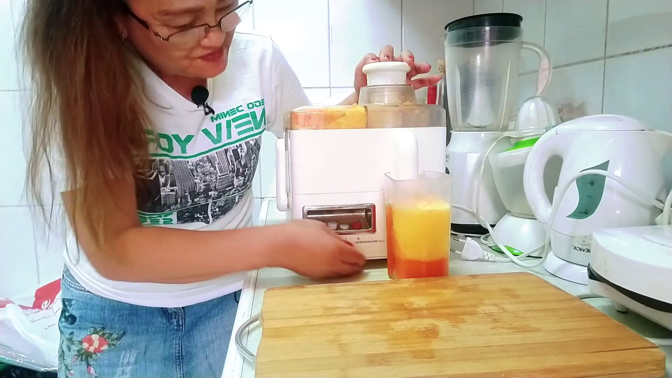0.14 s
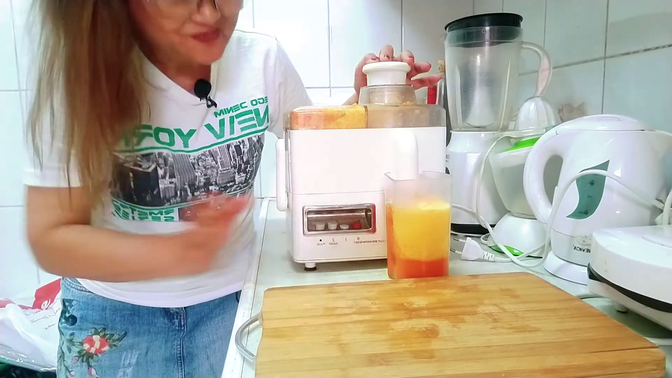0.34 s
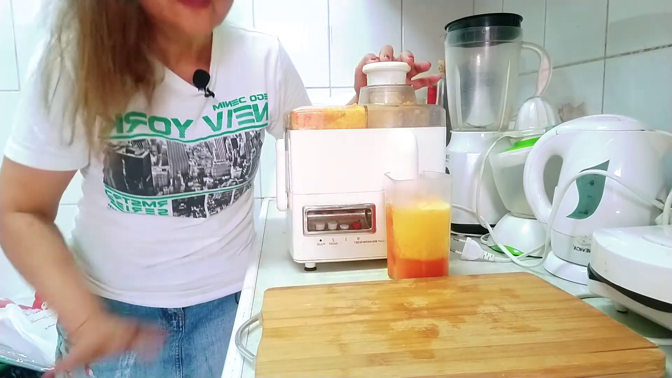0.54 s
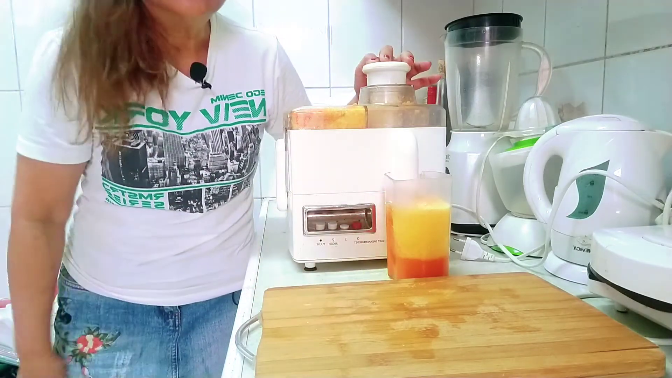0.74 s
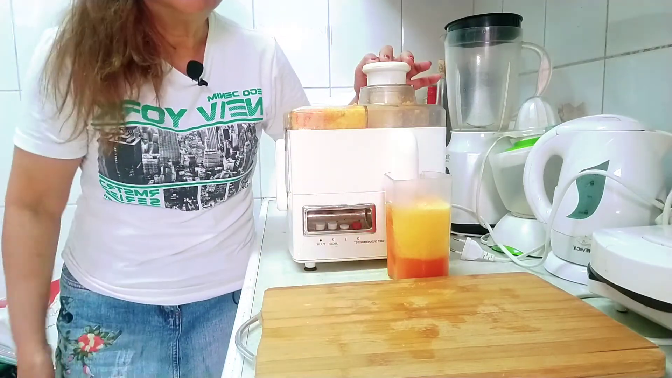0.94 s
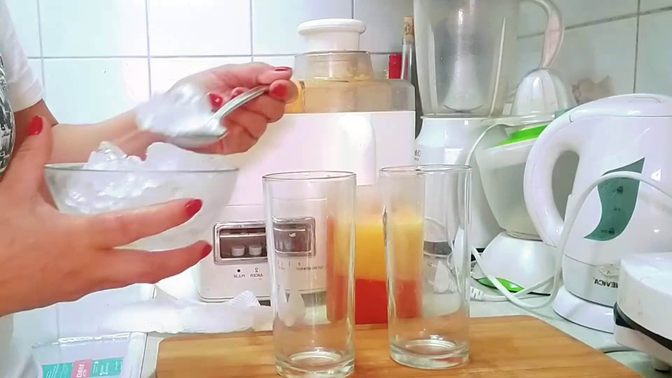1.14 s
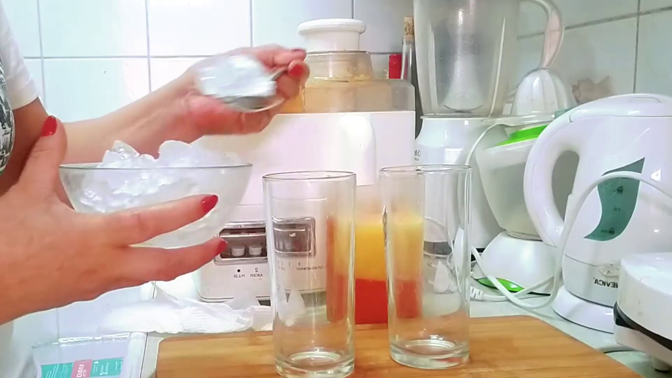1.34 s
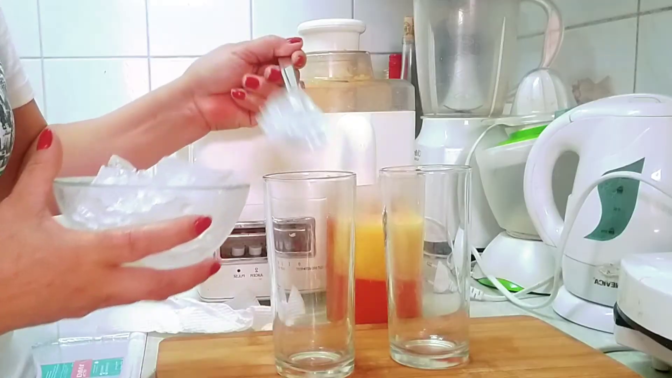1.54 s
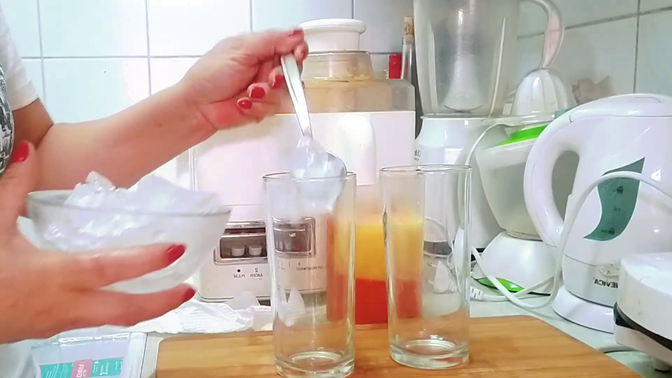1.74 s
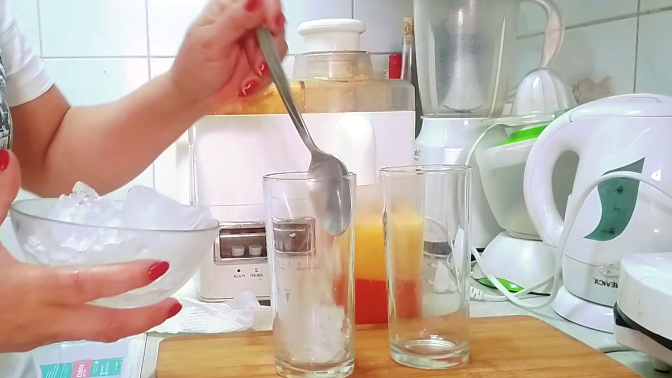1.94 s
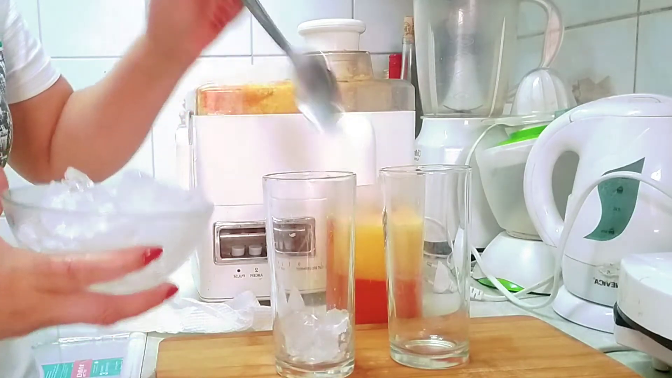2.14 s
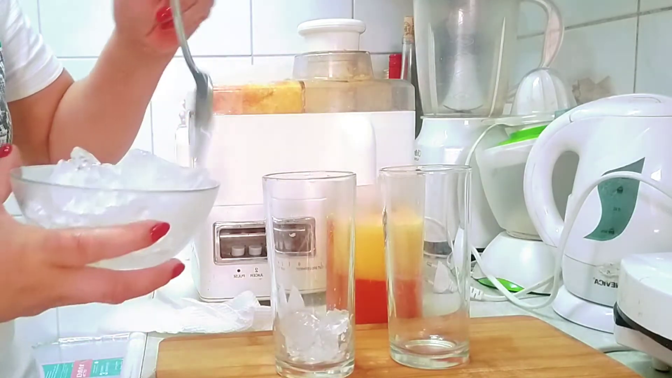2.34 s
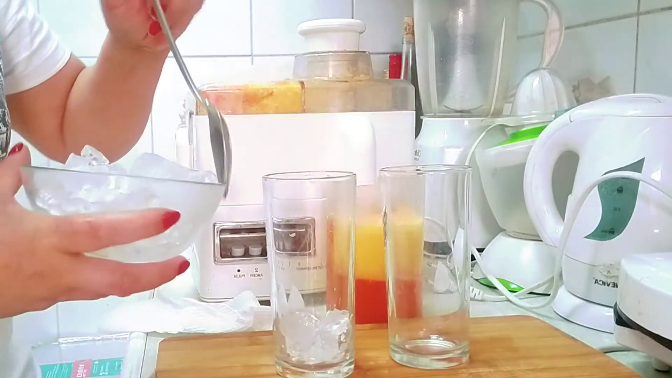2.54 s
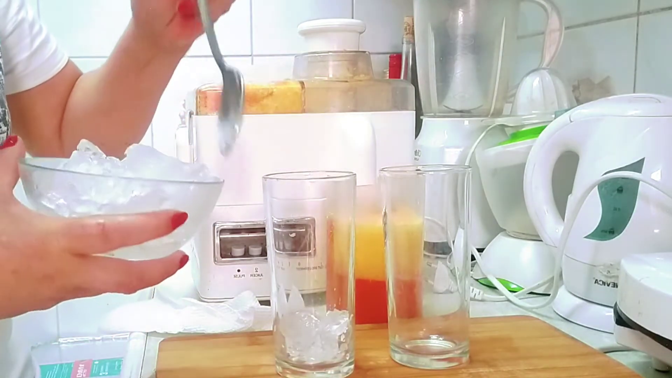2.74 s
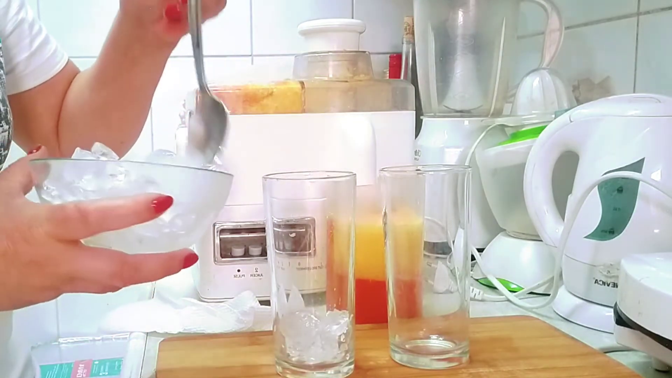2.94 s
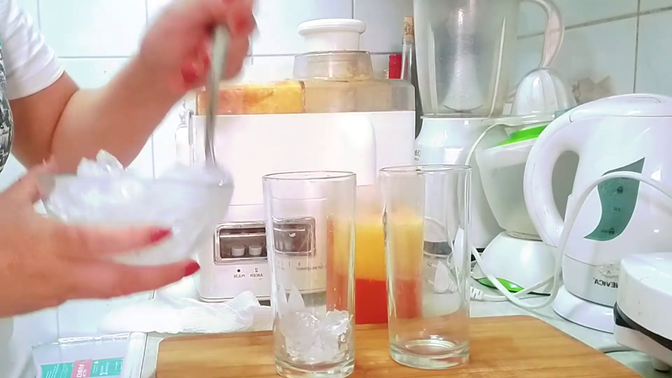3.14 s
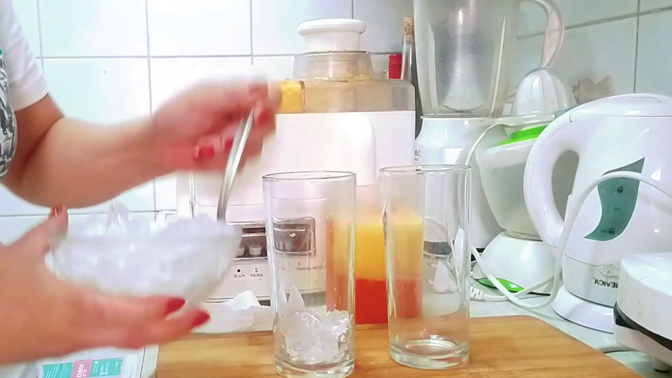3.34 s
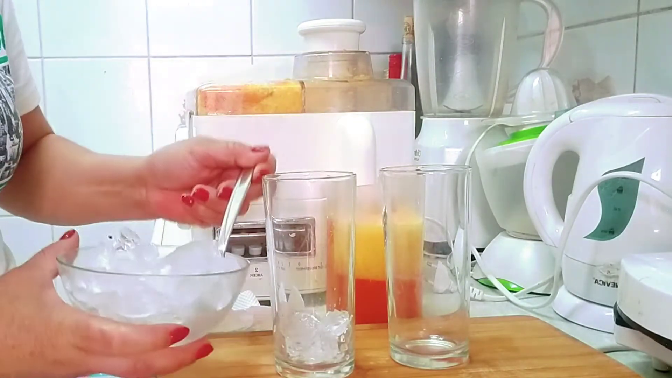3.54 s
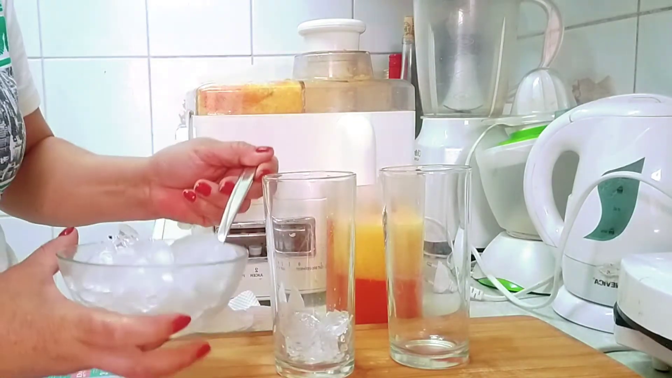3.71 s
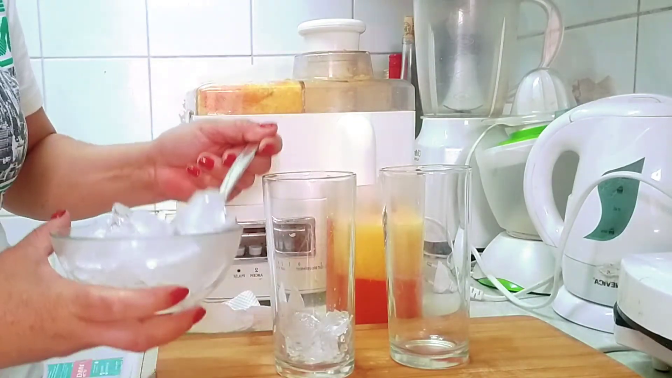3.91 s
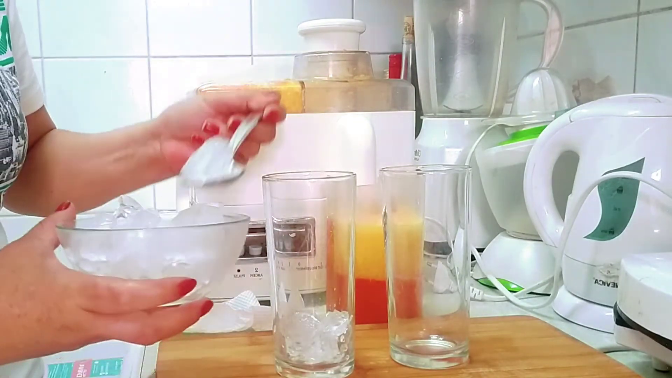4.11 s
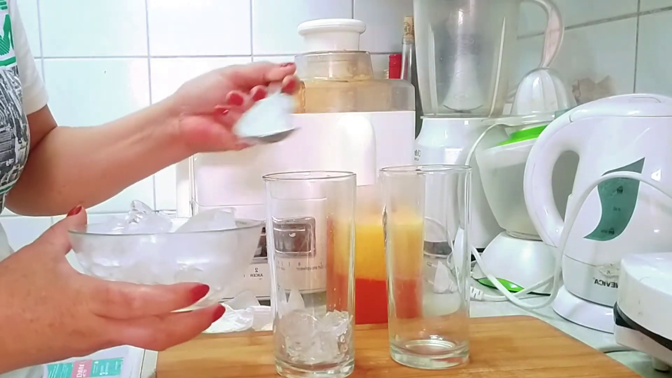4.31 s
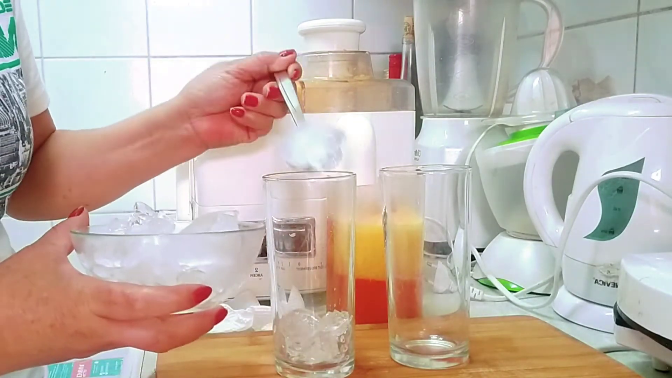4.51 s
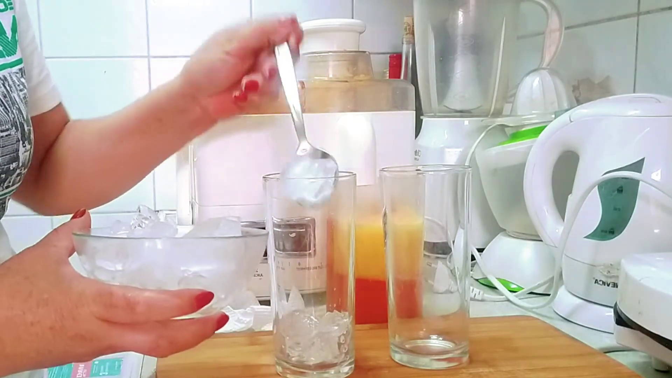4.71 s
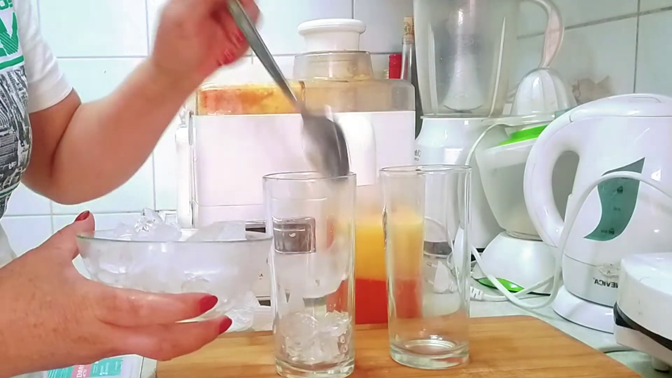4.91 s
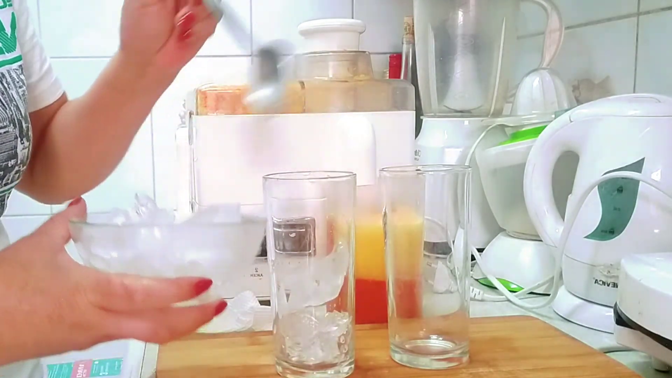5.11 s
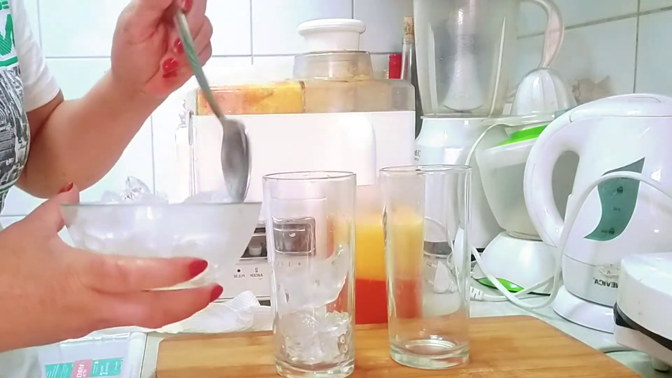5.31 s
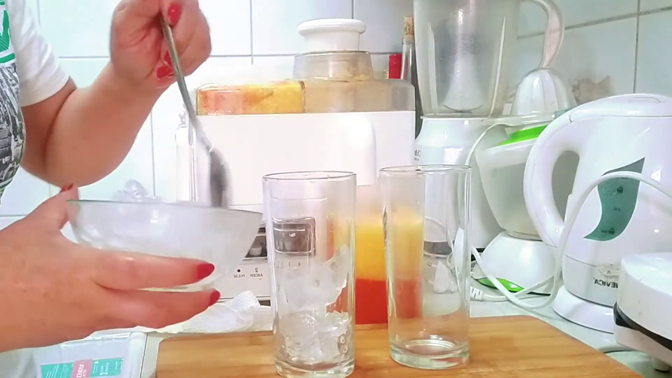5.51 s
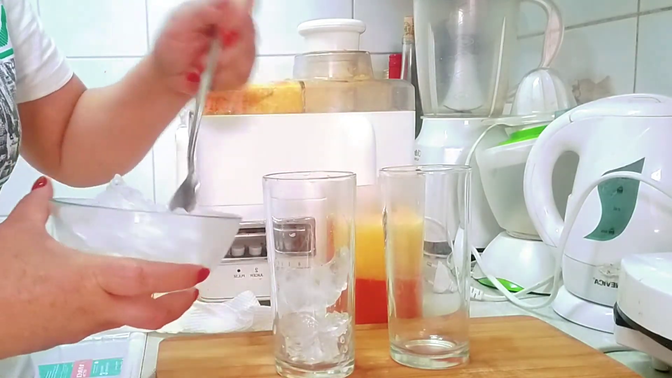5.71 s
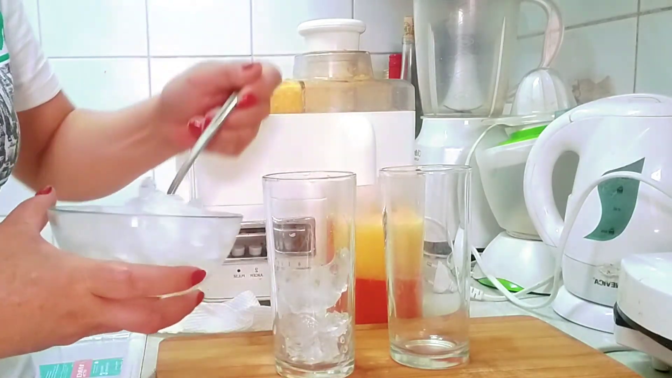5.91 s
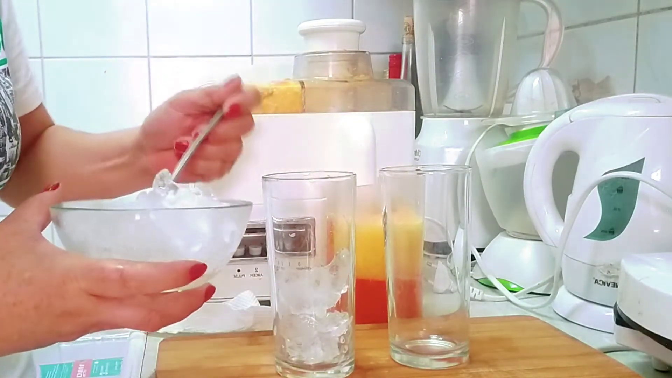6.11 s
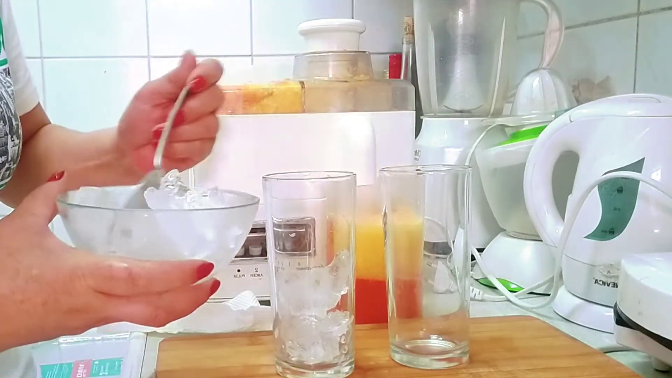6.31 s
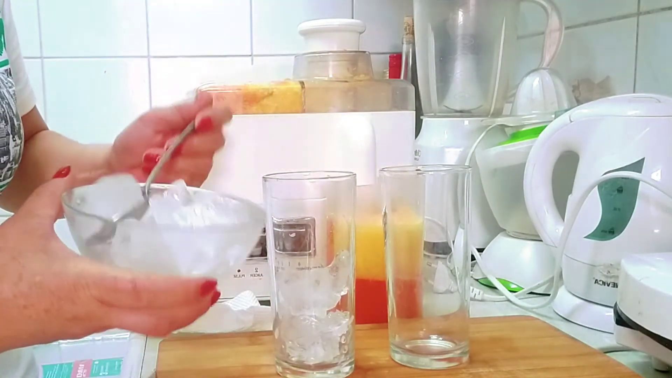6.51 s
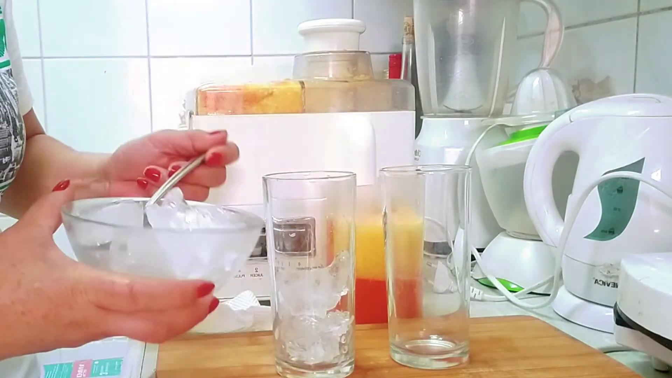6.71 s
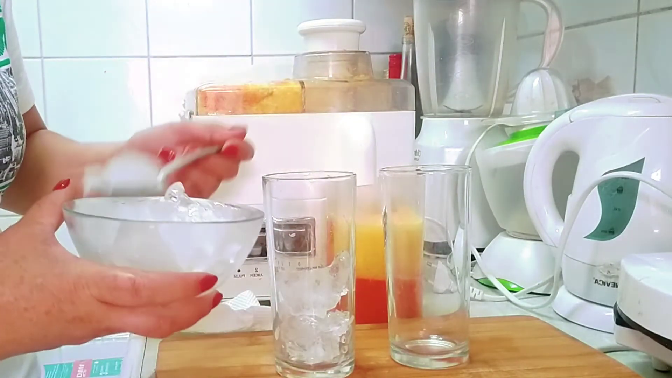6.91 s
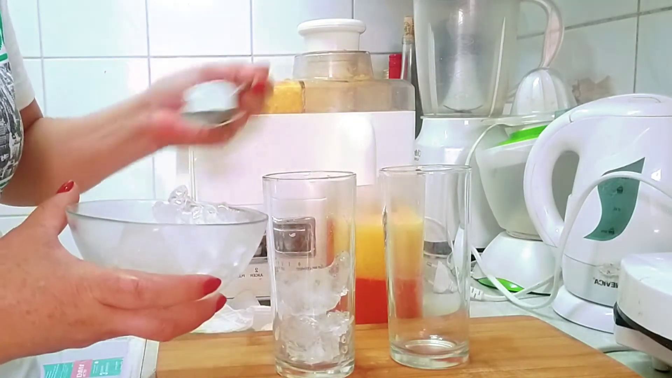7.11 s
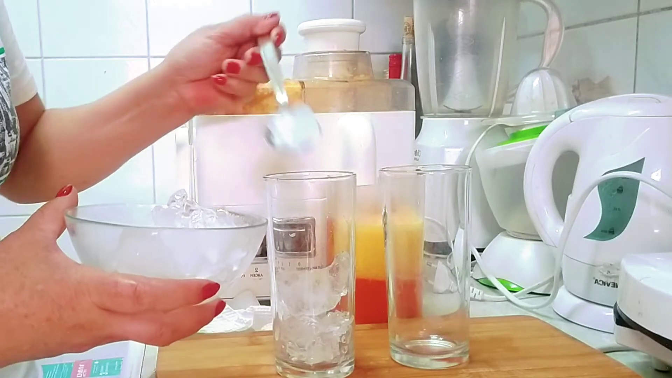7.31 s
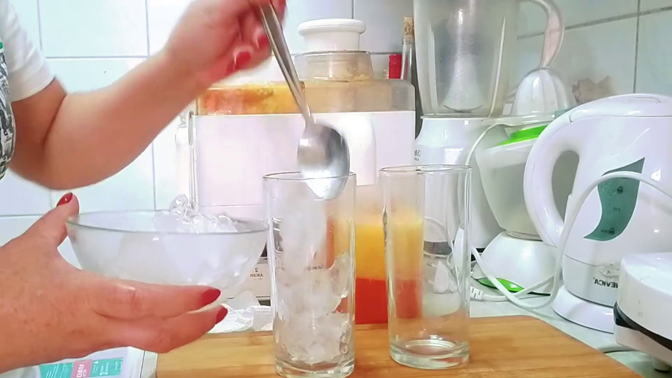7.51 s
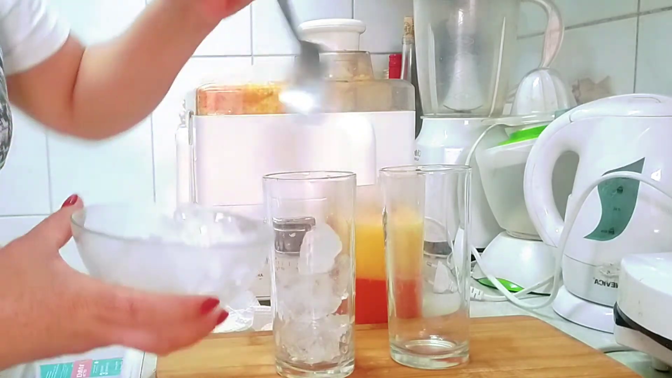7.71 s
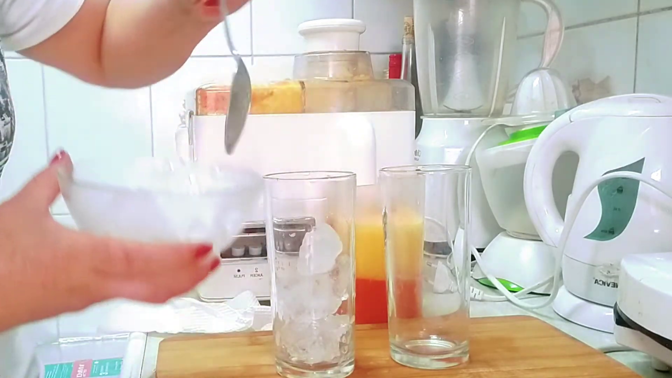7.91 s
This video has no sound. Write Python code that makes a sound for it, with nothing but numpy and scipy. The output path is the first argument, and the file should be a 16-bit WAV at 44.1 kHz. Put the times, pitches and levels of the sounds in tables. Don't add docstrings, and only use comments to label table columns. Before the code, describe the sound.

From 0 to about 1.35 s an electric juicer runs steadily: a midrange motor hum around 226 Hz with higher whine, rushing air and buzzing plastic shell, slightly rougher just before it cuts off. Then a quiet tiled kitchen with a low, wavering fridge hum. At 1.74 s crushed ice drops into a tall glass, a dense run of cracks and bright clinks to 2.2 s, the glass ringing and the board thudding softly. From 2.45 to 3.2 s a spoon digs in a glass bowl, hardest at 3.09. Light stirring, ticks and faint squeaks follow until 4.3 s. A second drop clatters at 4.69-5.04 s. Digging resumes from 5.36 s, with sharp crunches near 5.46 and 6.6 s and smaller ticks until 7.4 s. The third drop, loudest and brightest, lands at 7.52 s, its last lumps settling by 7.75 s.

```python
import sys
import numpy as np
from scipy import signal
from scipy.fft import rfft, irfft, next_fast_len
from scipy.io import wavfile
from scipy.ndimage import uniform_filter1d

SR = 44100
rng = np.random.default_rng(int(sys.argv[2]) if len(sys.argv) > 2 else 0)


def linear_from_db(decibels):
    return 10 ** (np.asarray(decibels, float) / 20)


def persist_wave(psi):
    counts = np.round(np.clip(psi, -1, 1) * 32767).astype(np.int16)
    wavfile.write(sys.argv[1], SR, np.atleast_2d(counts).T)


N = 350595

SHAFT_HZ, MAINS_HZ = 226.08, 100.2
# multiple of shaft speed, multiple of MAINS_HZ.
ORDERS = [(0, 1), (1, 0), (1, 1), (2, 0), (2, 1), (2, 2), (3, 0), (7, -1), (7, 0), (12, -1), (12, 0),
          (12, 1),
          (24, 0), (36, 0), (48, 0), (50, 0), (60, 0), (37, 0), (51, 0), (60, 1), (9, 0), (10, 0),
               (10, -1), (13, 0), (13, 1), (15, 0)]
TONES_DB = [-46, -31, -51, -50.5, -51.5, -50, -47, -49.5, -76, -49, -39, -61, -56.5, -44, -68, -68, -55,
            -53, -55, -56, -54.5, -55.5, -62, -70, -63, -56]
# frequency in Hz, density in dB per Hz.
WHIR = [(24, -63), (40, -49), (91, -17), (167, -17.5), (226, -11), (372, -17.5), (1040, -12.5), (1950, -20),
        (2770, -19.5), (2980, -22), (4800, -29.5), (7930, -27), (9220, -32), (14800, -20), (16000, -16.5)]
# frequency in Hz, width in Hz, level in dB.
HOUSING = [(731, 44, 1), (905, 180, 1.5), (1035, 170, 4), (1128, 39, 2.5), (1464, 510, -11),
           (2200, 720, -15), (3230, 81, -7.5)]
# time in seconds, level in dB.
LOAD = [
    (0.0, -0.5),
    (0.5, 0.5),
    (1.09, -2),
    (1.36, 2),
]
# start in seconds, end in seconds.
FADE = (1.342, 1.3874)
WAVER_DB, SHELL_DB, AIR_DB = .9, -33, -29
AIR_FOLLOWS = 0.05

# frequency in Hz, density in dB per Hz.
ROOM_TONE = [(12, -44), (20, 1.5), (46, -8.5), (65, -18.5), (101, -8), (172, -9.5), (285, -14.5),
             (357, -17.5), (678, -21), (825, -23.5), (897, -19), (1060, -22), (1570, -25), (3530, -33),
             (5500, -44.5), (7800, -38.5), (16000, -43.5)]
ROOM_DB = -58
# time in seconds, level in dB.
DRONE = [(1.4, -60.5), (2.71, -59), (2.95, -65.5), (3.81, -57), (4.65, -79), (4.68, -58), (5.25, -63.5),
         (5.54, -81), (5.69, -63.5), (6.67, -68), (6.74, -55), (7.42, -67), (7.53, -51.5), (7.95, -63.5)]
# frequency in Hz, level in dB.
HUMS = [(46, -65.5), (191, -74.5), (288, -68), (430, -72.5), (814, -71)]

# start in seconds, level in dB.
THUDS = [
    (1.741, -43.5),
    (1.926, -43),
    (2.07, -43),
    (4.686, -43),
    (4.798, -46),
    (4.94, -42.5),
    (7.52, -42),
    (7.596, -42),
]
BOARD_HZ, BOARD_WIDTH_HZ, BOARD_T60 = 125, 140, 0.29
# start in seconds, level in dB,
# frequency in Hz, t60 in seconds.
AIR_COLUMN = [(1.744, -30, 563, 0.073), (1.984, -40.5, 599, 0.21), (2.056, -38, 661, 0.13),
              (2.158, -41.5, 657, 0.21), (4.69, -38.5, 604, 0.1), (4.77, -42, 616, 0.13),
              (4.845, -44, 621, 0.24), (4.98, -43.5, 637, 0.13), (4.885, -42, 616, 0.049),
              (4.939, -39, 615, 0.079), (7.52, -33.5, 632, 0.066), (7.597, -44, 672, 0.14)]
# start in seconds, level in dB, frequency in Hz, t60 in seconds.
CLACKS = [
    (1.9111, -43, 1465, 0.25),
    (1.987, -29, 1730, .023),
    (6.608, -36, 1592, .16),
    (7.5957, -25.5, 1580, 0.078),
    (7.62, -30, 1604, 0.097),
]
# start in seconds, level in dB, frequency in Hz,
# t60 in seconds.
RINGS = [(2.011, -33, 11560, 0.38), (2.011, -44, 9200, .22), (2.052, -42, 6600, .2),
         (3.209, -40, 2150, 0.27), (4.003, -30, 14400, 0.071), (4.978, -28, 15200, .22),
         (5.363, -41.5, 3020, 0.21), (5.363, -47, 4200, .16), (6.218, -38, 3870, 0.1),
         (6.22, -41, 4000, 0.18), (6.609, -28.5, 2215, 0.41), (6.612, -38, 7850, 0.14),
         (7.52, -31.5, 2680, 0.045), (7.521, -23, 15235, 0.18)]
# start in seconds, level in dB, frequency in Hz, t60 in seconds.
PINGS = [(1.744, -31, 3540, 0.042), (1.932, -37, 3400, .08), (1.932, -20, 2580, 0.086),
         (1.933, -37, 1650, .05), (1.984, -30, 4060, 0.042), (2.051, -35, 1700, .09),
         (2.051, -35, 3910, .08), (2.056, -38, 4850, 0.053), (2.066, -48, 3570, 0.13),
         (2.086, -32, 4250, 0.053), (2.16, -32, 4800, 0.037), (2.172, -47, 1060, 0.039),
         (2.214, -50, 1150, 0.031), (2.468, -44, 2100, .05), (2.571, -35.5, 2166, 0.1),
         (3.026, -51, 11800, .1), (2.778, -38, 8560, .08), (3.088, -32, 14600, .06), (3.209, -38, 2230, .2),
         (4.897, -28, 11400, .04), (4.924, -28.5, 2750, 0.092), (4.924, -30, 2360, 0.092),
         (4.926, -24.5, 2540, .07), (4.93, -36, 7400, .06), (4.977, -26.5, 2604, 0.087),
         (5.46, -34, 7200, 0.073), (6.594, -33, 12700, 0.1), (5.676, -46, 942, 0.089),
         (5.675, -45, 2410, .12), (5.887, -32.5, 2460, .15), (5.953, -45, 3900, .15),
         (5.978, -46, 1520, 0.34), (6.218, -47, 8270, 0.13), (6.608, -36, 8530, .2),
         (6.971, -35.5, 2120, 0.035), (7.04, -44, 2210, 0.037), (7.262, -36, 2200, 0.04),
         (7.596, -28, 2600, 0.093), (7.66, -47, 4050, 0.045)]
LUMP_T60 = .11
FLUTTER = .6

GLASS_HZ = [2499, 2520, 2600, 5715, 5745, 6197, 6235, 8716, 9340, 9378, 10800, 11240, 11570, 11930, 12960,
            15235]
BOWL_HZ = [2150, 2223, 2546, 2900, 3951, 4107, 4344, 4974, 6000, 6080, 7180, 8522, 11140, 11790, 12720,
           14200]
# level in dB, t60 in seconds.
GLASS = [(-14, 0.1), (-22, 0.26), (-1, 0.071), (-6.5, 0.29), (-4.5, 0.26), (-33, 0.1), (-3.5, 0.064),
         (-47.5, .1), (-10, 0.19), (-12, 0.25), (-8, 0.15), (-8.5, 0.15), (-0.5, 0.093), (-27, 0.087),
         (-2, 0.12), (-1.5, 0.15)]
BOWL = [(-7, 0.24), (-12, 0.12), (2.5, 0.032), (-7.5, 0.12), (-7.5, 0.25), (-10.5, 0.12), (-5, 0.055),
        (-15, 0.087), (-1, 0.053), (-2.5, 0.25), (-28.5, 0.14), (-9, 0.13), (-7.5, 0.17), (-18, 0.14),
        (-13.5, 0.11), (-8.5, 0.17)]
SPOON_HZ = [5715, 5745]
# start in seconds, peak in dB, dullness (low over high) in dB,
# ring in dB.
DROPS_1 = [(1.7435, -13.5, 9.5, 1), (1.7595, -22, -4, 7.5), (1.814, -32.5, 3, 9), (1.9075, -17, -1, -10),
           (1.9305, -13.5, 3, -5), (1.9511, -19, 4, -8), (1.9849, -12.5, -4, -7), (2.0127, -26, -3, 1),
           (2.0505, -12, -4, -11), (2.0648, -11, -9, -8.5), (2.0859, -20.5, -13, -1.5),
           (2.1413, -29.5, -7, 2), (2.1634, -19, -14, -18)]
DROPS_2 = [(4.6885, -13, 8, 4.5), (4.7037, -22.5, -2, 4.5), (4.7711, -19, 2.5, -2), (4.8148, -48, 24, 26),
           (4.8408, -28, 3.5, 4.5), (4.8674, -24, -7, -2.5), (4.8863, -22, 7, 0.5), (4.9215, -21, -1, -5),
           (4.929, -13.5, 1, -1), (4.9787, -20, 0.5, 0.5), (4.9956, -32, 8, -16), (5.0386, -47, -6, -17)]
DROPS_3 = [
    (7.5181, -10.5, 6.5, 1),
    (7.5215, -4, -19, -13),
    (7.5737, -22, 13, 11),
    (7.585, -18.5, -6, -3),
    (7.5967, -19, 11, 6.5),
    (7.6226, -35, -3, 7),
    (7.6594, -29.5, 16, 9),
    (7.7363, -54, 14.5, -10),
]
# start in seconds, peak in dB, dullness in dB, ring in dB.
DIGS_1 = [
    (2.466, -31.5, 22, -13),
    (2.5694, -15, -0.5, -14),
    (2.779, -20, -6, -17),
    (3.0257, -37, 28, 2.5),
    (3.0723, -30.5, 12, -16.5),
    (3.0865, -6, -4.5, -17.5),
    (3.208, -15, -6.5, -16.5),
]
DIGS_2 = [(5.3632, -23, 6.5, -7), (5.4595, -12.5, -8, -18), (5.5325, -25.5, 4, -9), (5.641, -34.5, -9, -2),
          (5.6734, -26, 13, -25), (5.7708, -33.5, 20, 0.5), (5.8392, -30.5, 43, 2.5), (5.888, -21, 4, -16),
          (5.9197, -37, 7, -5), (5.9784, -24.5, -1, -31), (6.0194, -50, 15, -23), (6.0646, -66, -5, -22),
          (6.136, -40, 17, -14), (6.1985, -39, 14, -5), (6.217, -22, 7, -5), (6.3039, -32.5, 19, -7),
          (6.3555, -36, -4, -22),
          (6.4187, -31, 24, -5), (6.4347, -29, 10, -17), (6.467, -36.5, 24, -17), (6.5256, -28, 4, -5.5),
          (6.568, -32, 17, -1), (6.576, -26.5, 15, -10), (6.593, -22, -20, -12), (6.6064, -7, 6.5, -6.5),
          (6.64, -9.5, 4.5, -9), (6.703, -19, 1, -4), (6.951, -45, 4, -10), (6.97, -16, -13, -13),
          (7.0385, -38.5, 45, 4), (7.058, -24, -32, -19), (7.082, -31.5, -15, -15),
          (7.0987, -37.5, 13.5, -22), (7.2413, -20.5, 0, -26), (7.2875, -22, 5, -14.5),
          (7.4044, -44, -10, -16)]
# start in seconds, peak in dB, dullness in dB.
STIRS = [(3.455, -36.5, 22), (3.4664, -30, -6), (3.5344, -36, -22), (3.6574, -37, -2), (3.677, -33, -17),
         (3.6894, -32.5, -3), (3.716, -33, -9), (3.7658, -31, 15), (3.8524, -46, -5), (3.8764, -30, 0),
         (4.0041, -22.5, -4), (4.1255, -48, -6), (4.14, -40, 15), (4.1802, -35, 22), (4.2188, -25, 9.5),
         (4.235, -34, 18), (4.2966, -38, 39)]
STIR_RING_DB = -19
BAND_HZ = (300, 2200, 5500, 12000)
MIDDLE_SHARE, MIDDLE_DB = 0.46, 1.5
# frequency in Hz, level in dB.
CRACK = [(300, 2), (2300, 3.5), (4800, -1.5), (6200, -1.5), (7200, 2.5), (8400, 5), (10200, -8), (12500, 3),
         (14800, 7.5), (16000, 7.5)]
SHIVER_DB = 5
TOUCH_DB = -5

# time in seconds,
# level in dB, t60 in seconds.
WALL = [(1.7436, -17.5, 0.47), (1.7694, -21.5, 0.57), (1.8144, -35, 0.71), (1.8674, -38, 0.32),
        (1.93, -26, 0.3), (1.9674, -41, 0.36), (2.0124, -42, 0.55), (2.0642, -37.5, 0.7),
        (2.1394, -43.5, 0.26), (4.6884, -21.5, 0.23), (4.716, -29, .2), (4.731, -24.5, 0.33),
        (4.755, -31, 0.13), (4.7711, -29.5, .2), (4.8005, -32, 0.64), (4.8294, -28, 0.51),
        (4.855, -37.5, 0.22), (4.887, -31.5, 0.27), (4.9244, -30, 0.29), (4.9791, -38, 0.27),
        (5.0294, -39.5, 0.17), (5.09, -55, 0.24), (7.574, -26.5, 0.26), (7.6, -36, 0.12),
        (7.6216, -28.5, 0.73), (7.6594, -32, 0.19), (7.7, -57, 0.16), (7.7343, -43, .4),
        (7.7672, -45, 0.37)]
# time in seconds, level in dB, t60 in seconds.
RIM = [(1.7436, -22, 0.31), (1.812, -47, .2), (1.8327, -31, 0.31), (1.899, -50, .2), (1.933, -32, 0.2),
       (1.96, -42, .2), (2.0657, -41, 0.23), (4.6885, -33.5, 0.3), (4.7526, -45, 0.3),
       (4.7704, -32.5, 0.16), (4.8854, -51, 0.3), (4.9247, -52, 0.18), (4.9771, -33, 0.22),
       (5.02, -46, 0.29), (7.5842, -32.5, 0.33), (7.6224, -37, 0.3), (7.6594, -40, 0.25), (7.71, -65, 0.21)]
WALL_HZ, RIM_HZ = 2501, 6200

# start in seconds, length in seconds, level in dB, brightness in dB.
SLIDES = [(1.797, 0.33, -45, 25), (1.965, 0.073, -34.5, -20), (2.64, 0.11, -48.5, -2.5),
          (3.156, 0.048, -39.5, 3.5), (3.44, 0.3, -54, 8), (3.752, 0.33, -54.5, 5.5), (4.01, 0.23, -54, 1),
          (4.855, 0.042, -44, 0), (4.925, 0.065, -62, -2), (5.496, 0.21, -45.5, -21),
          (5.748, 0.15, -57, 26), (5.92, 0.089, -39.5, -0.5), (6.497, 0.31, -61.5, -5),
          (6.62, 0.12, -45.5, 6), (7.15, 0.086, -73, -6), (7.55, 0.2, -57, 3)]
SLIDE_RISE_DB_PER_S, SLIDE_FALL_DB_PER_S, REST_DB = 155.5, 112, -77
# frequency in Hz, density in dB per Hz.
ICE = [(500, -14), (1200, -3), (2400, 1.5), (3600, -5), (5200, -12.5), (8200, -7.5), (10500, -14),
       (14800, -4.5), (16000, -2)]
CLUMP_DB, PATCH_DB, SING_DB = 2.3, 3.3, -3
# frequency in Hz, t60 in seconds.
KITCHEN = [(200, 1), (1500, 0.41), (4000, 0.53), (9000, 0.4), (16000, 0.26)]
NOTES_ROOM_DB = -7
# start in seconds, length in seconds, level in dB,
# first frequency in Hz, last frequency in Hz.
SQUEAKS = [
    (3.375, 0.073, -57.5, 2430, 2450),
    (3.581, 0.13, -62, 2490, 2360),
    (3.785, 0.079, -66, 2420, 2240),
    (4.003, 0.092, -57, 2100, 2390),
    (4.217, 0.057, -58, 3000, 2960),
    (4.356, .07, -67, 2350, 2320),
]
# start in seconds, length in seconds, level in dB, frequency in Hz, width in Hz.
SWISH = (4.51, .17, -69, 3700, 700)
EDGE_HZ = 15530


def evened(x):
    return x / np.sqrt(np.mean(x ** 2) + 1e-20)


def read(points, hz):
    f, value = np.transpose(points)
    return np.interp(np.log(hz + 1), np.log(f + 1), value)


def curve(rows):
    return np.interp(np.arange(N) / SR, [r[0] for r in rows], [r[1] for r in rows])


def add(mix, s, sound):
    part = mix[round(s * SR):][:len(sound)]
    part += sound[:len(part)]


def coloured(x, points):
    size = next_fast_len(len(x))
    gain = linear_from_db(read(points, np.fft.rfftfreq(size, 1 / SR)))
    return evened(irfft(rfft(x, size) * gain, size)[:len(x)])


def wander(hz, size=N):
    b, a = signal.butter(2, hz, fs=SR / 64)
    coarse = signal.lfilter(b, a, rng.standard_normal(size // 64 + 2))
    return evened(np.interp(np.arange(size) / 64, np.arange(len(coarse)), coarse))


def resonate(x, hz, width):
    turn = np.exp(2j * np.pi * hz * np.arange(len(x)) / SR)
    r = np.exp(-np.pi * width / SR)
    return 2 * (turn * signal.lfilter([1 - r], [1, -r], x / turn)).real


def resonate_twice(x, hz, width):
    return resonate(resonate(x, hz, width), hz, width)


def juicer():
    t = np.arange(round(FADE[1] * SR)) / SR
    size = len(t)
    turns = np.cumsum(SHAFT_HZ * (1 + 0.00025 * wander(4.2, size))) / SR
    tones = np.zeros(size)
    for (k, m), db in zip(ORDERS, TONES_DB):
        cycles = k * turns + m * MAINS_HZ * t + rng.random()
        tones += linear_from_db(db + WAVER_DB * wander(8.8, size)) * np.sin(2 * np.pi * cycles)
    throb = 1 + 0.039 * np.sin(2 * np.pi * MAINS_HZ * t) + 0.064 * np.sin(2 * np.pi * turns)
    shake = throb * rng.standard_normal(size)
    shell = evened(sum(linear_from_db(db) * resonate_twice(shake, hz, width) for hz, width, db in HOUSING))
    air = coloured(throb * rng.standard_normal(size), WHIR)
    load_db = curve(LOAD)[:size]
    sound = np.sqrt(2) * tones
    sound += linear_from_db(SHELL_DB + load_db) * shell
    sound += linear_from_db(AIR_DB + AIR_FOLLOWS * load_db) * air
    return np.pad(sound * np.interp(t, FADE, [1, .2]), (0, N - size))


def background():
    phase = 2 * np.pi * np.cumsum(96 + 2.26 * wander(4.33)) / SR
    hum = linear_from_db(curve(DRONE) + 3.5) * np.sin(phase) * linear_from_db(1.8 * wander(11))
    for hz, db in HUMS:
        hum += linear_from_db(db + 5.5 * wander(2.5)) * np.sin(2 * np.pi * hz * np.arange(N) / SR)
    return linear_from_db(ROOM_DB) * coloured(rng.standard_normal(N), ROOM_TONE) + hum


def board_thuds():
    out, t = np.zeros(N), np.arange(18000) / SR
    for s, db in THUDS:
        rumble = evened(resonate_twice(rng.standard_normal(len(t)), BOARD_HZ, BOARD_WIDTH_HZ))
        add(out, s, linear_from_db(db - 1.5 - 60 * t / BOARD_T60) * rumble * (1 - np.exp(-t / 0.0014)))
    return out


def single_notes():
    out, t = np.zeros(N), np.arange(18000) / SR
    pings = [(s, db, hz, min(t60, LUMP_T60)) for s, db, hz, t60 in PINGS]
    for s, db, hz, t60 in AIR_COLUMN + CLACKS + RINGS + pings:
        tone = np.sin(2 * np.pi * hz * t + FLUTTER * wander(60, len(t)))
        tone *= linear_from_db(6 * FLUTTER * wander(50, len(t)))
        add(out, s, linear_from_db(db - 60 * t / max(t60, .02)) * tone * (1 - np.exp(-t / 0.00043)))
    return out


def ice_crack(colour):
    t = np.arange(2000) / SR
    lump_hz = np.arange(300, 17000, 450)
    lump_db = read(colour, lump_hz) + read(CRACK, lump_hz) + 3 * rng.standard_normal(len(lump_hz))
    fall = np.exp(-t / 0.003) + 0.15 * np.exp(-t / 0.025)
    burst = coloured(rng.standard_normal(2000), list(zip(lump_hz, lump_db)))
    return burst * fall * (1 - np.exp(-t / 0.0015))


def blow(row, hz, modes, ring, blur, size):
    s, peak_db, dull_db, ring_db = row
    band_db = [dull_db, MIDDLE_SHARE * dull_db + MIDDLE_DB, 0]
    colour = list(zip(BAND_HZ, [dull_db - 19.5, *band_db]))
    crack = ice_crack(colour)
    t = np.arange(size) / SR
    (db, t60), hz = np.transpose(modes)[..., None], np.array(hz)[:, None]
    luck, detune, turn = rng.standard_normal((3, *hz.shape))
    db = db + read(colour, hz) - max(band_db) + 3 * luck
    steps = rng.standard_normal((len(hz), size // 200)).repeat(200, axis=1)
    flutter = uniform_filter1d(steps, size=300, axis=1)
    phase = hz * (1 + .005 * blur * detune) * t + turn + .3 * blur * flutter
    shiver = evened(uniform_filter1d(flutter[::-1], size=700, axis=1))
    shiver_db = SHIVER_DB * shiver * np.minimum(t / .02, 1)
    decay = np.exp(-np.log(1000) * t / (ring * t60))
    sound = (linear_from_db(db + shiver_db) * decay * np.sin(2 * np.pi * phase)).sum(0) * linear_from_db(ring_db - 8.5)
    sound *= 1 - np.exp(-t / 0.00018)
    return s, linear_from_db(peak_db) * np.transpose([sound, np.pad(0.55 * crack, (0, size - len(crack)))])


def choke(s, sound, rows):
    t = s + np.arange(len(sound))[:, None] / SR
    touches = sum(np.clip((t - later) / .004, 0, 1) for later, *_ in rows if later > s)
    return s, sound * linear_from_db(TOUCH_DB * touches)


def ice():
    out = np.zeros((N, 2))
    spoon = np.isin(GLASS_HZ, SPOON_HZ)[:, None] * [1, 0]
    # blows, share of t60 left, blur of the modes, spoon level in dB
    drops = [(DROPS_1, .8, .11, -2), (DROPS_2, .65, .13, -7), (DROPS_3, .4, .12, -12)]
    for rows, ring, blur, spoon_db in drops:
        modes = GLASS + spoon_db * spoon
        for row in rows:
            s, sound = blow(row, GLASS_HZ, modes, ring, blur, size=13000)
            add(out, *choke(s, sound, rows))
    stirs = [(*stir, STIR_RING_DB) for stir in STIRS]
    for row in DIGS_1 + stirs + DIGS_2:
        add(out, *blow(row, BOWL_HZ, BOWL, ring=.75, blur=1.4, size=8000))
    return out.T


def wall(rows, hz):
    t = np.arange(N) / SR
    s, db, t60 = np.transpose(rows)
    last = np.maximum(np.searchsorted(s, t) - 1, 0)
    level = linear_from_db(db[last] - 60 * (t - s[last]) / np.maximum(t60[last], .03)) * (t > s[0])
    sway = 1 + 0.001495 * wander(27.7)
    swing = np.sin(2 * np.pi * np.cumsum(hz * sway) / SR)
    return uniform_filter1d(level, size=60) * linear_from_db(1.96 * wander(43)) * swing


def slides(t):
    s, length, db, bright_db = np.transpose(SLIDES)[..., None]
    rise_db = (s - t) * SLIDE_RISE_DB_PER_S
    fall_db = (t - s - length) * SLIDE_FALL_DB_PER_S
    gain = linear_from_db(db - np.maximum(0, np.maximum(rise_db, fall_db)))
    level = gain.sum(0) + linear_from_db(REST_DB)
    return level, (gain * bright_db).sum(0) / level


def shuffle():
    ticks = linear_from_db(2.0 * np.minimum(rng.exponential(1, N), 5) + CLUMP_DB * wander(27))
    ticks *= rng.random(N) < 3500 / SR
    hz, t, z = signal.stft(coloured(ticks * rng.standard_normal(N), ICE), SR, nperseg=256)
    patches = uniform_filter1d(rng.standard_normal(z.shape), size=14, axis=0)
    patches = uniform_filter1d(patches, size=14, axis=1)
    level, bright_db = slides(t)
    tilt_db = bright_db * np.clip(hz / 9000, 0, 1)[:, None]
    grain = signal.istft(z * linear_from_db(PATCH_DB * evened(patches) + tilt_db), SR, nperseg=256)[1][:N]
    grain += linear_from_db(SING_DB + CLUMP_DB * wander(9)) * resonate(grain, 2420, 35)
    begun = np.arange(N) > DROPS_1[0][0] * SR
    return linear_from_db(-8) * np.interp(np.arange(N) / SR, t, level) * grain * begun


def kitchen(x):
    hz, t, z = signal.stft(rng.standard_normal(30000), SR, nperseg=256)
    tail = signal.istft(z * linear_from_db(-60 * t / read(KITCHEN, hz)[:, None]), SR, nperseg=256)[1]
    tail *= np.clip((np.arange(len(tail)) / SR - .002) / 0.016, 0, 1)
    return signal.fftconvolve(x, tail / np.linalg.norm(tail))[:N]


def squeaks():
    out, t = np.zeros(N), np.arange(8000) / SR
    for s, length, db, start_hz, end_hz in SQUEAKS:
        share = np.minimum(t / length, 1)
        hz = (start_hz + (end_hz - start_hz) * share) * (1 + .015 * wander(60, len(t)))
        grain = .6 + wander(70, len(t))
        swell = np.sin(np.pi * share) ** .5
        add(out, s, linear_from_db(db + 1.0) * grain * swell * np.sin(2 * np.pi * np.cumsum(hz) / SR))
    return out


def swish():
    s, length, db, hz, width = SWISH
    rub = rng.standard_normal(round(.3 * SR))
    t, out = np.arange(len(rub)) / SR, np.zeros(N)
    rub = evened(resonate_twice(rub, hz, width)) * linear_from_db(3.2 * wander(25, len(t)))
    add(out, s, linear_from_db(db) * rub * np.sin(np.pi * np.minimum(t / length, 1)))
    return out


def scene():
    rings, hits = ice()
    notes = board_thuds() + single_notes() + rings + wall(WALL, WALL_HZ) + wall(RIM, RIM_HZ)
    struck = hits + shuffle() + squeaks()
    room = linear_from_db(-5) * kitchen(struck + linear_from_db(NOTES_ROOM_DB) * notes)
    mix = juicer() + background() + struck + notes + room + swish()
    return np.tile(mix, (2, 1))


def top_cut(x):
    return signal.sosfilt(signal.butter(12, 16650, fs=SR, output="sos"), x)


def record(dry):
    edge = signal.firwin(1201, EDGE_HZ, window=("kaiser", 7), fs=SR)[None]
    mix = signal.oaconvolve(dry, edge, "same")
    return top_cut(mix)


dry = scene()
out = record(dry)
persist_wave(out)
```